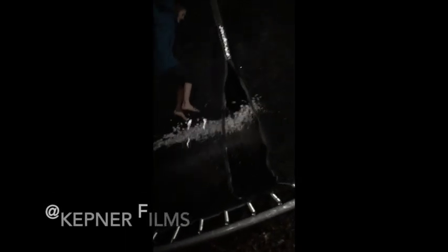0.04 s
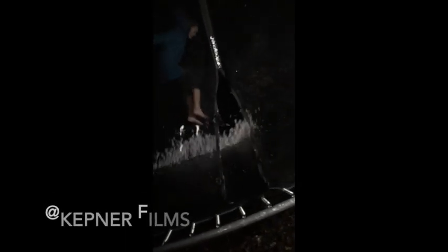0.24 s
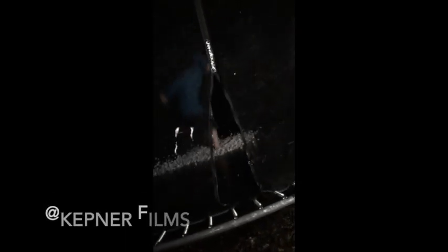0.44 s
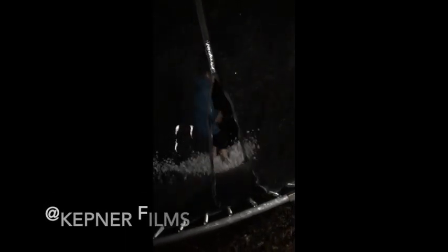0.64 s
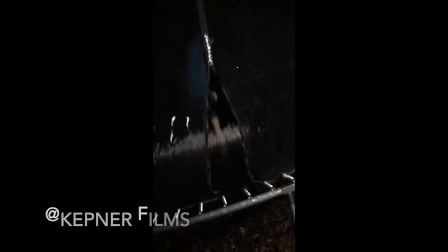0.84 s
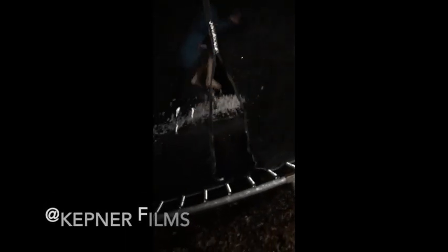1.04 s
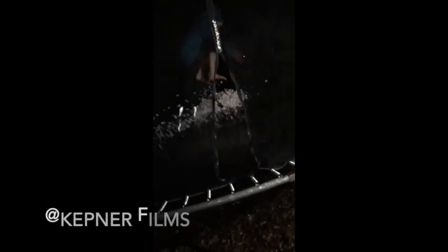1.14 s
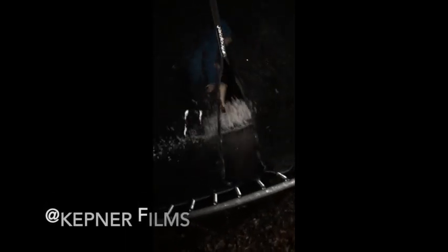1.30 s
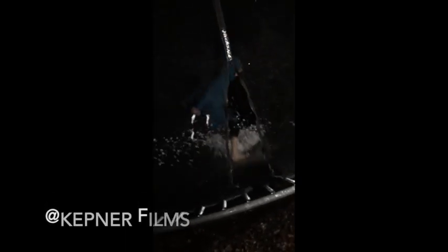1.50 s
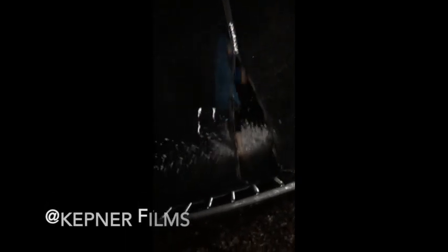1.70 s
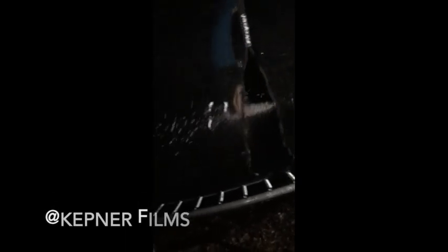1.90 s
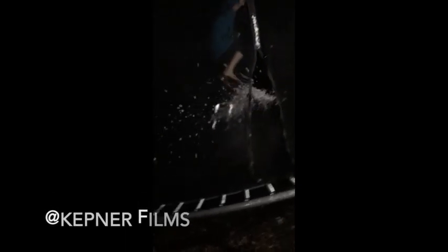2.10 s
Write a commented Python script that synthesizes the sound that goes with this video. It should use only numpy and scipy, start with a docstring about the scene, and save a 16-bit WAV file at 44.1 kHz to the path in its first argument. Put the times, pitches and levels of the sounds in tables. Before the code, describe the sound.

Loose hail clatters and sprays on a bouncing trampoline, with low thumps and faint squeaks.

```python
"""Hail on a trampoline

Someone bounces twice on a trampoline covered in hailstones, outdoors at night. On each bounce the ice
rains back onto the mat, slides into the dip and is flung up again: stones drum on the taut fabric, clack
together and spray fine chips. The mat booms under the feet and the steel springs squeak thinly."""
import sys
import numpy as np
from scipy import signal
from scipy.fft import rfft, irfft
from scipy.io import wavfile
from scipy.ndimage import uniform_filter1d

SR = 44100
rng = np.random.default_rng(int(sys.argv[2]) if len(sys.argv) > 2 else 0)


def wrap_up_sound(samples):
    """Save the sound to the file named by the first command line argument, as 16-bit audio."""
    columns = np.atleast_2d(samples).T
    # keep every value between -1 and 1, then stretch to whole-number steps
    tamed = np.clip(columns, -1, 1)
    steps = np.round(tamed * 32767).astype(np.int16)
    wavfile.write(sys.argv[1], SR, steps)


N = 94815
T = np.arange(N) / SR
FULL_DB, RATE_EXPONENT = -25, 0.5  # nominal impact rates hold at FULL_DB; rate ~ amplitude ** exponent
TOP_HZ = 15700

# clatter of the large stones (time [s], level [dB])
CLATTER_ENVELOPE = [(0, -41.5), (.1, -51), (.17, -47.5), (.23, -32), (.28, -27), (.37, -29), (.43, -29),
                    (.445, -34.5), (.48, -35), (.51, -24.5), (.56, -38), (.63, -33.5), (.74, -20),
                    (.795, -27.5), (.815, -32), (.95, -37), (1.15, -55), (1.23, -47.5), (1.29, -33.5),
                    (1.39, -28.5), (1.51, -30), (1.53, -37.5), (1.57, -38.5), (1.65, -25.5), (1.68, -24.5),
                    (1.72, -23), (1.85, -35), (1.98, -47), (2.15, -54)]
# spray of fine ice (time [s], level [dB])
SPRAY_ENVELOPE = [(0.0, -46), (0.02, -43), (0.05, -55), (0.05, -49), (0.09, -56.5), (0.13, -49.5),
                  (0.18, -50.5), (0.23, -33.5), (0.29, -30), (0.41, -30.5), (0.46, -42), (0.51, -32),
                  (0.56, -41.5), (0.66, -32), (0.73, -23.5), (0.82, -35), (1.1, -48), (1.12, -54.5),
                  (1.16, -52.5), (1.2, -54.5), (1.32, -33.5), (1.42, -27), (1.54, -42), (1.61, -35.5),
                  (1.63, -29), (1.67, -24.5), (1.72, -26.5), (1.92, -45), (1.93, -38.5), (1.95, -50),
                  (2.15, -52)]


def undb(db):
    return 10 ** (np.asarray(db) / 20)


def unit(x):
    return x / np.sqrt(np.mean(x ** 2) + 1e-18)


def fade(t, t60_s):
    return np.exp(-np.log(1000) * np.maximum(t, 0) / t60_s) * (t >= 0)


def band(x, lo_hz, hi_hz):
    sos = signal.butter(2, [lo_hz, min(hi_hz, SR / 2 - 1000)], "band", fs=SR, output="sos")
    return signal.sosfilt(sos, x)


def ring(x, response):
    """Convolve with the response scaled to unit energy."""
    return signal.fftconvolve(x, response / np.sqrt(np.sum(response ** 2)))[:N]


def colour(points, skirt_db_per_oct=36, size=4096):
    """Minimum-phase response through (frequency [Hz], level [dB]) points, falling beyond the ends."""
    hz, db = np.array(points, float).T
    octave = np.log2(np.maximum(np.fft.rfftfreq(size, 1 / SR), 1))
    knots = np.log2(hz)
    beyond_oct = np.maximum(knots[0] - octave, 0) + np.maximum(octave - knots[-1], 0)
    spectrum_db = np.interp(octave, knots, db) - skirt_db_per_oct * np.minimum(beyond_oct, 2)
    cepstrum = irfft(np.log(undb(spectrum_db)))
    cepstrum[1:size // 2] *= 2
    cepstrum[size // 2 + 1:] = 0
    return irfft(np.exp(rfft(cepstrum)))


def surge(envelope):
    """Amplitude from (time [s], level [dB]) points."""
    time_s, db = np.array(envelope).T
    return undb(np.interp(T, time_s, db))


def impact_rate(gain, nominal_per_s):
    """Impacts per second: louder ice is also denser."""
    return nominal_per_s * (gain / undb(FULL_DB)) ** RATE_EXPONENT


def impacts(per_s, scatter_db):
    """Random impulses of scattered size, unit power at any rate."""
    probability = np.minimum(per_s / SR, 1)
    struck = rng.random(N) < probability
    size = unit(undb(scatter_db * np.clip(rng.standard_normal(N), -2, 2)))
    sign = rng.choice([-1, 1], N)
    return struck * sign * size / np.sqrt(probability)


def stones(per_s, scatter_db, lo_hz, hi_hz, crack_share):
    """Five stone sizes, each ringing briefly in its own band, mixed with broadband cracks."""
    edges_hz = np.geomspace(lo_hz, hi_hz, 6)
    pings = sum(band(impacts(per_s / 2, scatter_db), lo, hi) for lo, hi in zip(edges_hz, edges_hz[1:]))
    cracks = impacts(per_s, scatter_db)
    return np.sqrt(1 - crack_share) * pings + np.sqrt(crack_share) * cracks


def drumming():
    """The taut fabric answers each hailstone with a short low note; harder hits are brighter."""
    # hail landing on the mat (time [s], level [dB])
    envelope = [(0, -40), (.11, -50.5), (.17, -47.5), (.25, -27), (.33, -25), (.36, -26.5), (.41, -25.5),
                (.45, -33), (.52, -27.5), (.57, -33.5), (.68, -26), (.7, -21.5), (.76, -16.5),
                (.825, -28.5), (.95, -33), (1.02, -39.5), (1.04, -42.5), (1.16, -53), (1.22, -49),
                (1.26, -32.5), (1.35, -26.5), (1.46, -26), (1.56, -40), (1.63, -28.5), (1.66, -21),
                (1.73, -18.5), (1.77, -21), (1.84, -25.5), (1.96, -41.5), (2.15, -48)]
    # spectrum of one hit (frequency [Hz], relative level [dB])
    spectrum = [(90, -5.5), (125, -1.5), (150, -4), (190, 0.5), (240, 0), (320, -1.5), (390, -2.5),
                (450, -6.5), (490, -8.5), (535, -10), (610, -20)]
    crossover_hz, brighten_exponent = 415, 0.43
    gain = surge(envelope)
    hits = gain * impacts(impact_rate(gain, 2400), scatter_db=1.5)
    notes = ring(hits, colour(spectrum, skirt_db_per_oct=28.5))
    lows = signal.sosfiltfilt(signal.butter(2, crossover_hz, fs=SR, output="sos"), notes)
    highs = (notes - lows) * (gain / undb(FULL_DB)) ** brighten_exponent
    return undb(0.55) * (lows + highs)


def clatter():
    """Large hailstones clack against each other."""
    # spectrum of one clack (frequency [Hz], relative level [dB])
    spectrum = [(340, -44.5), (570, -3.5), (615, -6.5), (707, -3.5), (768, -4.5), (853, -1.5), (1200, -2.5),
                (1470, -3.5), (1880, -7.5), (2390, -7.5), (3000, -11.5), (3900, -24.5), (6600, -120)]
    gain = surge(CLATTER_ENVELOPE)
    clacks = stones(impact_rate(gain, 5500), scatter_db=2.5, lo_hz=438, hi_hz=3720, crack_share=0.44)
    return undb(0.17) * ring(gain * clacks, colour(spectrum, skirt_db_per_oct=37.5))


def pellets():
    """Mid-sized stones rattle, carried along by both the large stones and the spray."""
    # spectrum of one pellet impact (frequency [Hz], relative level [dB])
    spectrum = [(3000, -5), (3300, -1.5), (3800, 0), (4400, -1.5), (4950, -5), (5400, -.5), (6100, -1),
                (7000, -6.5)]
    spray_weight = 0.46
    gain = surge(CLATTER_ENVELOPE) ** (1 - spray_weight) * surge(SPRAY_ENVELOPE) ** spray_weight
    rattle = stones(impact_rate(gain, 7000), scatter_db=3.5, lo_hz=2500, hi_hz=8500, crack_share=0.35)
    return undb(-3) * ring(gain * rattle, colour(spectrum, skirt_db_per_oct=50))


def chips():
    """Chips too small to ring skitter over the weave."""
    # spectrum of one chip impact (frequency [Hz], relative level [dB])
    spectrum = [(7050, -5.5), (7650, -5), (8550, -1.5), (9550, -1.4), (10050, -2.5), (10400, -6.5),
                (10850, -1.4), (12050, -1.3), (14050, -0.5), (16000, -1.5)]
    gain = surge(SPRAY_ENVELOPE)
    skitter = impacts(impact_rate(gain, 11000), scatter_db=1.5)
    return undb(-1) * ring(gain * skitter, colour(spectrum, skirt_db_per_oct=69))


def crunches():
    """Squeezed patches of ice grind briefly and stop; a bigger heap sounds lower."""
    # crunching patches (start [s], length [s], centre [Hz], width [oct], level [dB])
    patches = [(0.265, 0.051, 1420, 0.64, -29), (.38, .06, 3580, 0.95, -34.5),
               (.492, .052, 2150, 1.55, -31), (1.664, 0.063, 840, 0.82, -22.5)]
    rise_s, stop_s = 0.014, 0.012
    out = np.zeros(N)
    for start_s, length_s, hz, width_oct, db in patches:
        press = np.clip((T - start_s) / rise_s, 0, 1) * np.clip((start_s + length_s - T) / stop_s, 0, 1)
        edge_ratio = 2 ** (width_oct / 2)
        grind = band(impacts(per_s=9000, scatter_db=2.5), hz / edge_ratio, hz * edge_ratio)
        out += undb(db) * press * unit(grind)
    return out


def boom():
    """The loaded mat shakes in its deep modes."""
    # heaves of the mat under load (peak time [s], rise [s], fall [s], level [dB])
    heaves = [(.36, 0.059, 0.04, -30), (.53, 0.044, 0.071, -33), (.74, 0.077, 0.083, -35),
              (.9, 0.052, 0.098, -35), (1.39, 0.064, 0.12, -29), (1.73, 0.032, 0.11, -37),
              (1.85, 0.047, 0.21, -40.5)]
    # modes of the whole mat (frequency [Hz], relative level [dB], t60 [s])
    modes = [(58.4, -3.5, 0.31), (80, -3.5, 0.29), (92, 1, 0.037), (114.5, -1.5, 0.03)]
    load_power, shake = np.zeros(N), np.zeros(N)
    for peak_s, rise_s, fall_s, db in heaves:
        heave = np.exp(np.where(T < peak_s, (T - peak_s) / rise_s, (peak_s - T) / fall_s))
        load_power += (undb(db) * heave) ** 2
    for hz, db, t60_s in modes:
        mode = fade(T, t60_s) * np.sin(2 * np.pi * hz * T)
        shake += undb(db) * ring(impacts(per_s=400, scatter_db=4.5), mode)
    return np.sqrt(load_power) * unit(band(shake, 57, 204))


def ticks():
    """Lone stones strike close by, each a sharp burst of narrowband noise."""
    # stone strikes (start [s], centre [Hz], t60 [s], onset level [dB])
    strikes = [(0.013, 6500, .05, -40.5), (.0523, 11500, .02, -39), (.068, 9000, .006, -40),
               (.132, 12000, .025, -46), (0.2056, 5900, 0.0034, -31), (1.117, 5500, .014, -41),
               (1.15, 4400, 0.011, -32.5), (2.078, 5100, 0.012, -47), (2.1108, 3800, .005, -37)]
    edge_ratio = 2 ** 0.19
    out = np.zeros(N)
    for start_s, hz, t60_s, db in strikes:
        noise = unit(band(rng.standard_normal(N), hz / edge_ratio, hz * edge_ratio))
        out += undb(db) * fade(T - start_s, t60_s) * noise
    return out


def thuds():
    """Lone lumps drop on the fabric, each a low damped tone."""
    # falling lumps (start [s], pitch [Hz], t60 [s], onset level [dB])
    lumps = [(0.743, 195, 0.08, -21), (0.798, 262, 0.035, -12.5), (1.12, 171, 0.022, -26),
             (1.191, 265, 0.022, -34), (1.661, 275, 0.047, -18), (1.726, 210, 0.076, -28),
             (1.85, 153, 0.068, -20), (1.928, 160, 0.036, -27), (2.045, 296, 0.041, -34)]
    return sum(undb(db) * fade(T - start_s, t60_s) * np.sin(2 * np.pi * hz * (T - start_s))
               for start_s, hz, t60_s, db in lumps)


def springs():
    """Spring hooks slip on the frame: thin fluttering squeaks with faint side partials and some rasp."""
    # hook slips (start [s], length [s], pitch [Hz], level [dB])
    squeaks = [(0.05, 0.0065, 11000, -41), (.058, .011, 11000, -50), (0.132, 0.0084, 11000, -40.5),
               (0.152, 0.023, 11100, -50), (.4765, .008, 11000, -43), (0.617, 0.0076, 11900, -29.5),
               (.8305, .012, 10900, -38), (.8845, .007, 11000, -38), (.975, 0.067, 11000, -48),
               (1.033, 0.09, 11000, -51), (1.092, .007, 15400, -46), (1.111, 0.043, 10970, -43),
               (1.525, .016, 10980, -39), (1.526, .009, 15400, -41), (1.559, .019, 11100, -43),
               (1.93, .014, 15400, -44)]
    # partials of a squeak (ratio to pitch, relative level [dB])
    partials = [(0.427, -19), (1.002, -2), (1.087, -12), (1.4, -11)]
    rise_s = 0.0015
    waver_hz = 70 * unit(uniform_filter1d(rng.standard_normal(N), size=40))
    flutter_db = 2.8 * unit(uniform_filter1d(rng.standard_normal(N), size=200))
    rasp = undb(-13) * unit(band(rng.standard_normal(N), 11500, 15000))
    out = np.zeros(N)
    for start_s, length_s, hz, db in squeaks:
        on = (T >= start_s) & (T < start_s + length_s)
        attack = np.clip((T[on] - start_s) / rise_s, 0, 1)
        release = np.clip(2 * (start_s + length_s - T[on]) / length_s, 0, 1)
        phase = 2 * np.pi * np.cumsum(hz + waver_hz[on]) / SR
        tone = sum(undb(partial_db) * np.sin(ratio * phase)
                   for ratio, partial_db in partials if ratio * hz < TOP_HZ)
        out[on] += undb(db) * attack * release * (np.sqrt(2) * tone + rasp[on])
    return out * unit(undb(flutter_db))


def yard(near):
    """Faint, short reverberation of the yard, 5 ms behind the direct sound."""
    return undb(-16.5) * ring(near, rng.standard_normal(N) * fade(T - 0.005, t60_s=0.2))


def night():
    """Steady low hush outdoors."""
    # background noise (frequency [Hz], relative level [dB])
    spectrum = [(25, -16), (70, -23), (300, -10), (1000, -17), (5000, -40), (16000, -30)]
    return undb(-54) * ring(rng.standard_normal(N), colour(spectrum))


def scene():
    """Ice, mat and springs in the yard at night, mono."""
    moving_ice = drumming() + clatter() + pellets() + chips() + crunches()
    near = moving_ice + boom() + ticks() + thuds() + springs()
    return (near + yard(near) + night())[None]


def record(dry):
    """Steep low-pass at TOP_HZ."""
    return signal.sosfilt(signal.ellip(12, .1, 80, TOP_HZ, fs=SR, output="sos"), dry)


dry = scene()
out = record(dry)
wrap_up_sound(out)
```